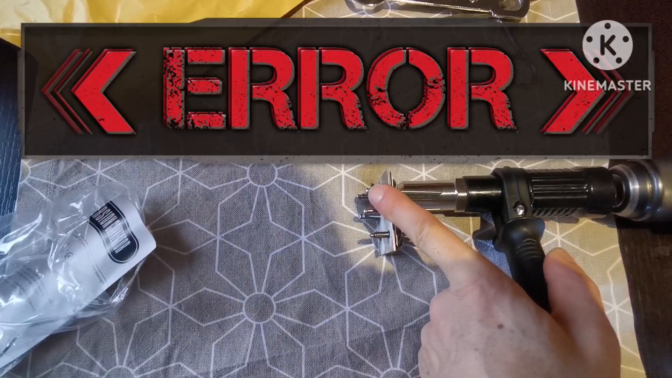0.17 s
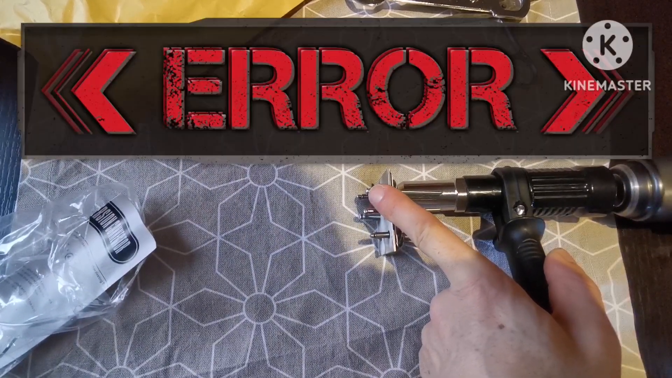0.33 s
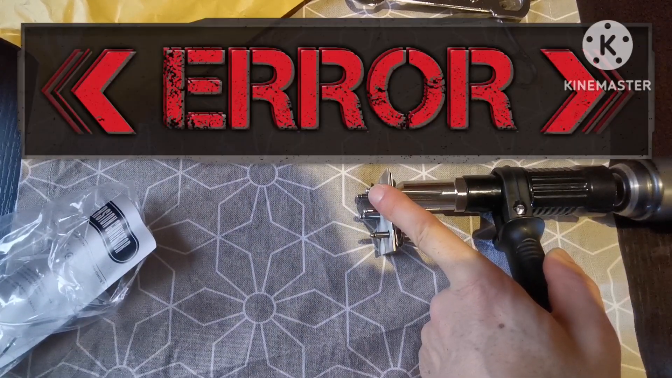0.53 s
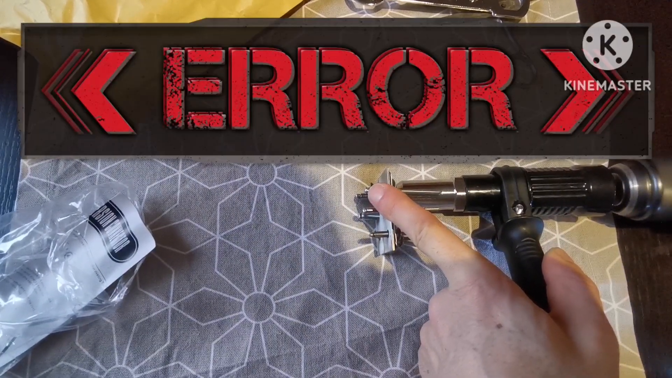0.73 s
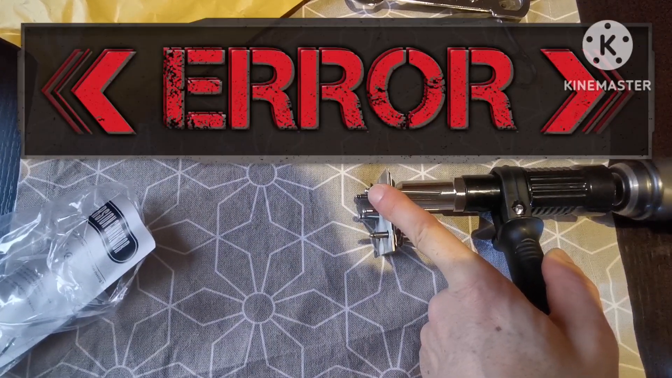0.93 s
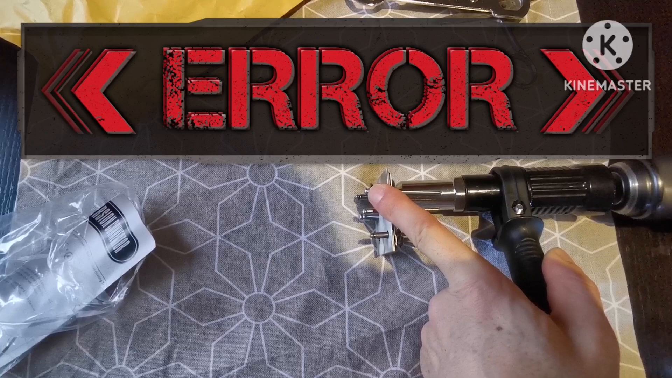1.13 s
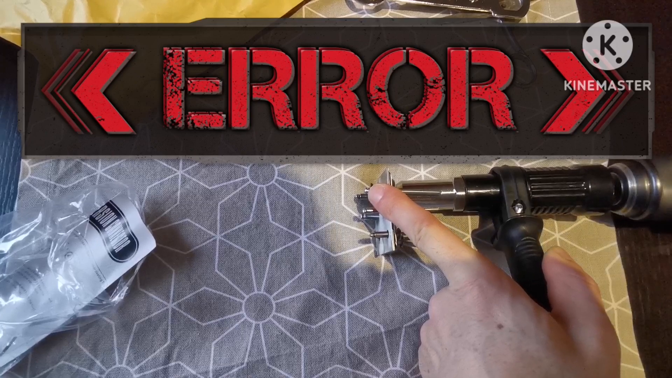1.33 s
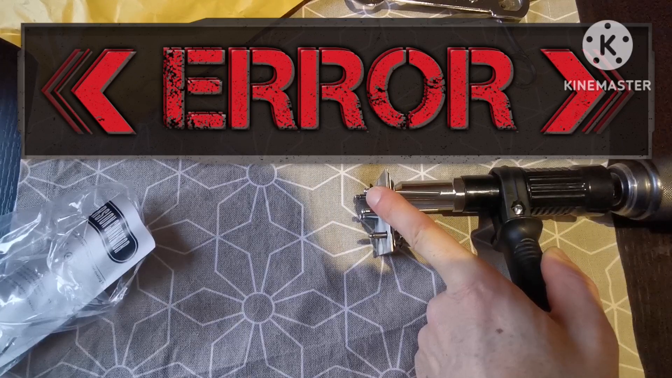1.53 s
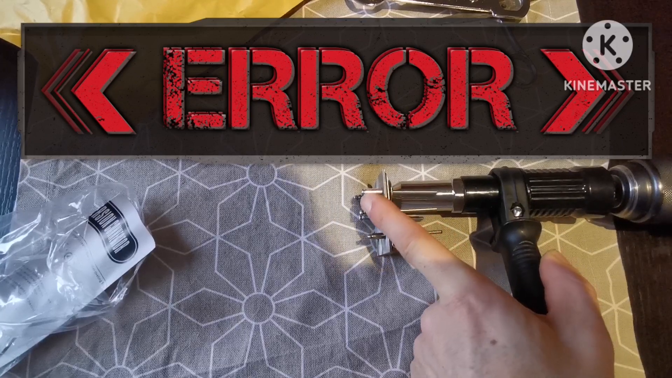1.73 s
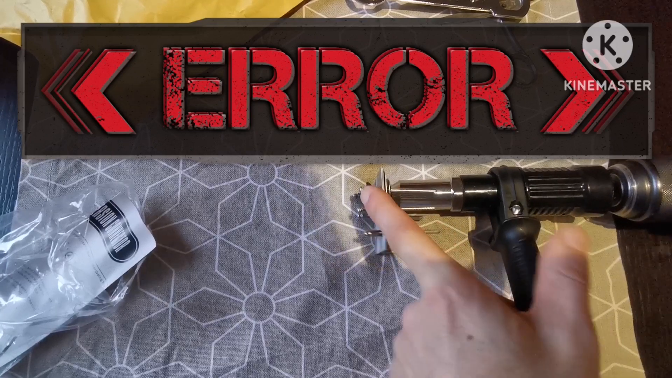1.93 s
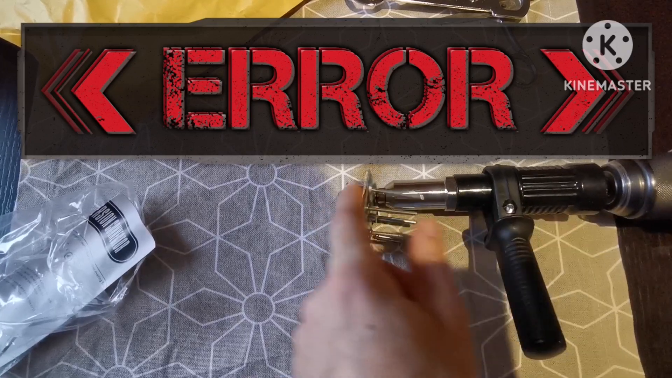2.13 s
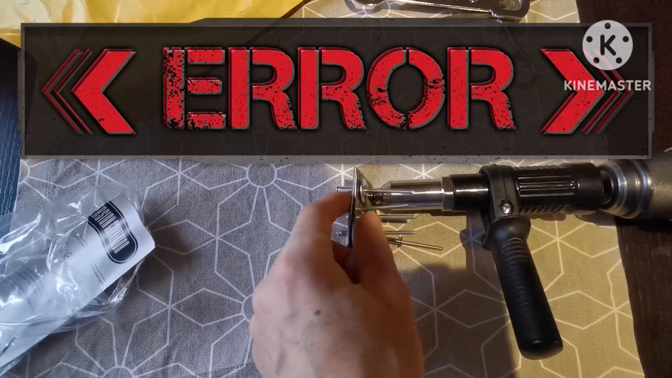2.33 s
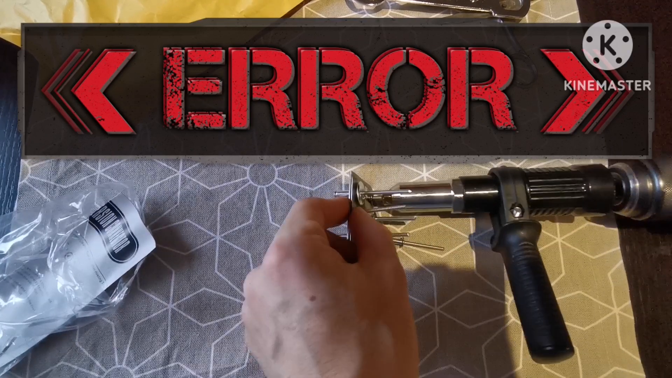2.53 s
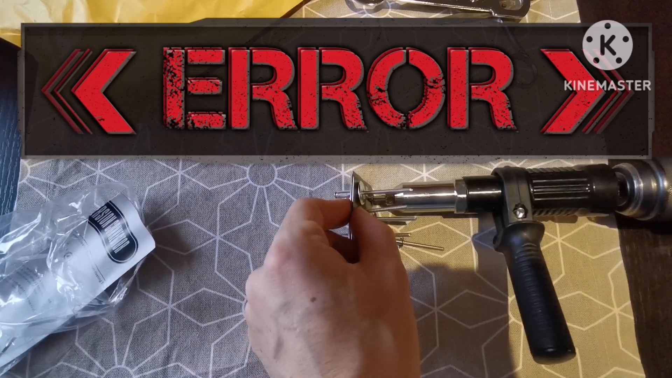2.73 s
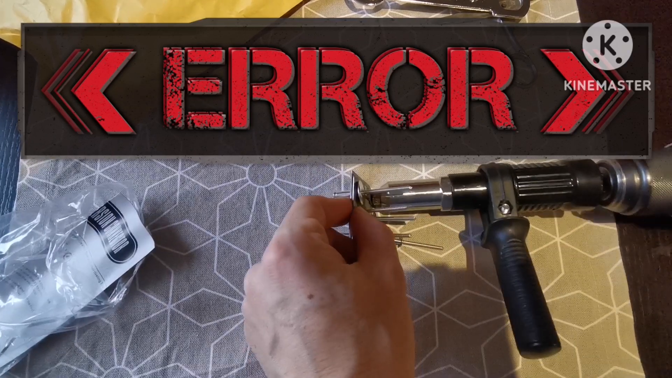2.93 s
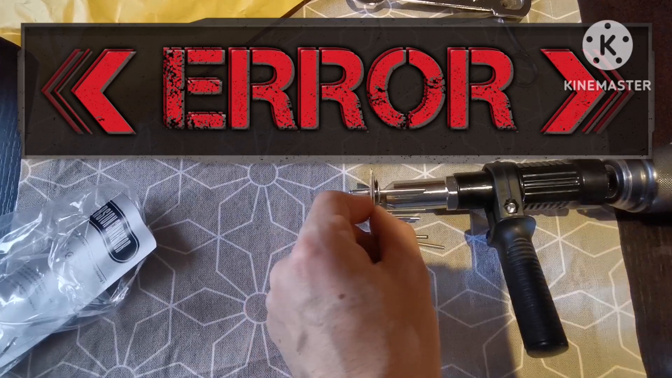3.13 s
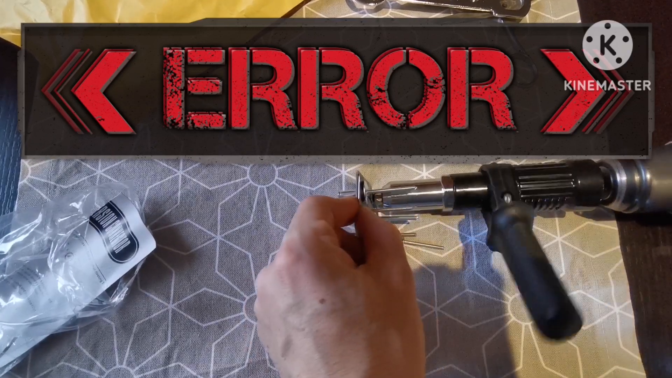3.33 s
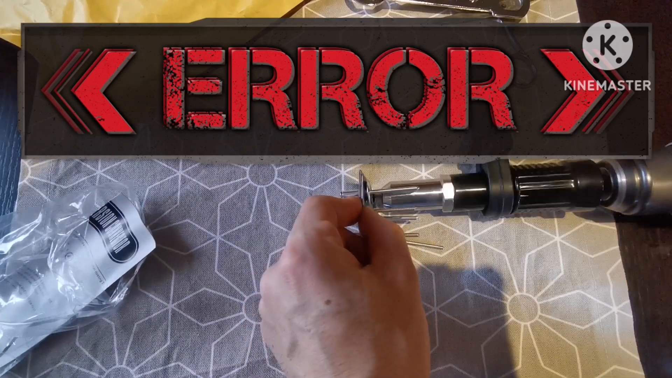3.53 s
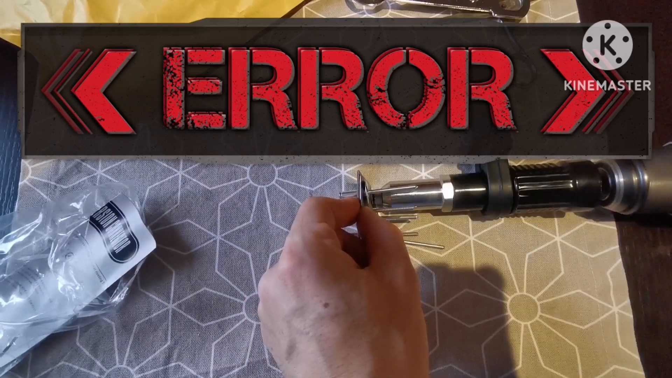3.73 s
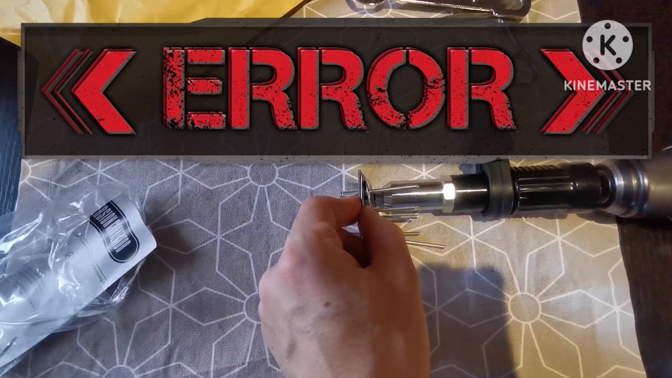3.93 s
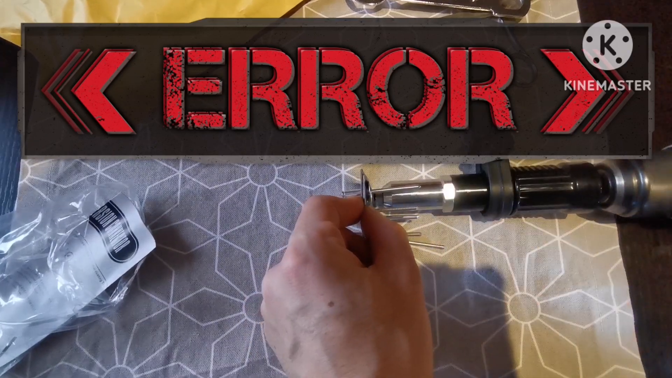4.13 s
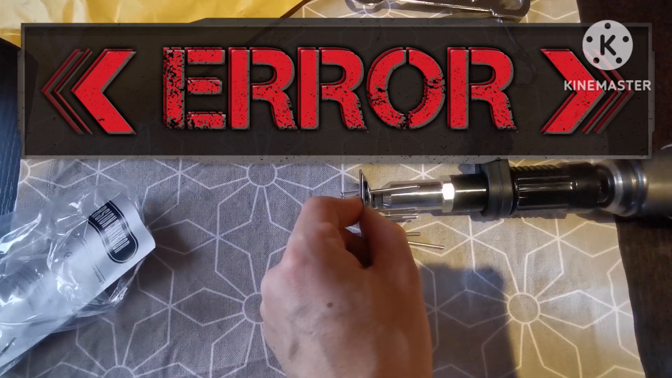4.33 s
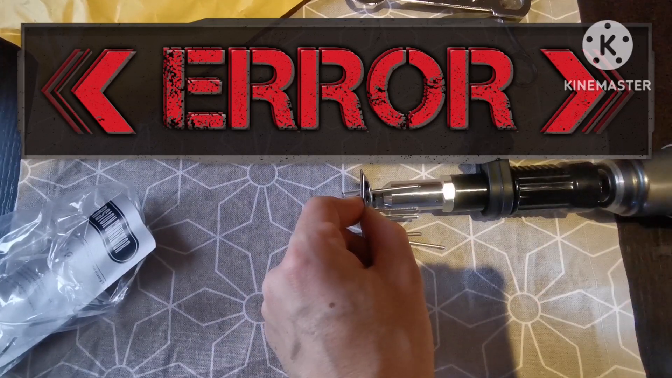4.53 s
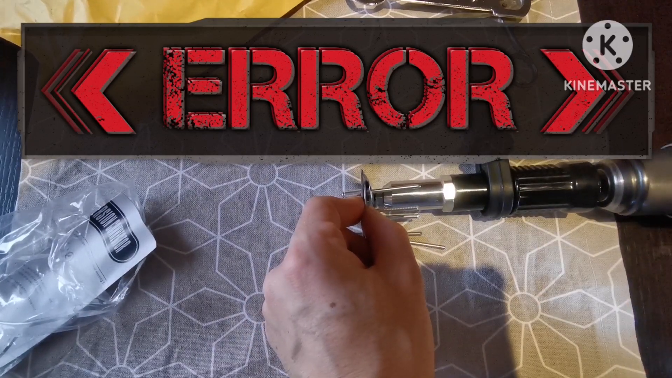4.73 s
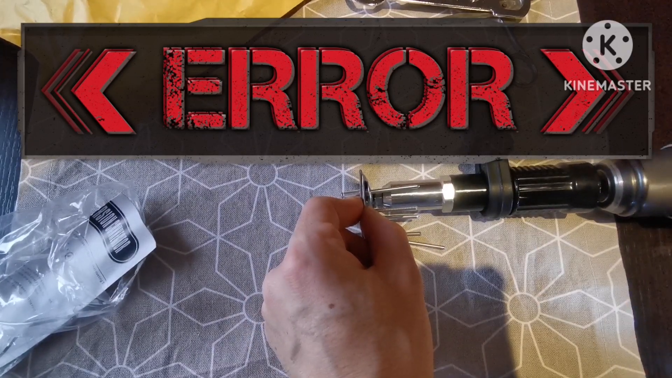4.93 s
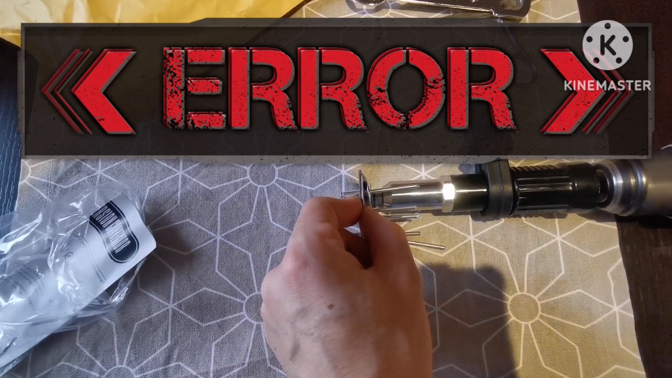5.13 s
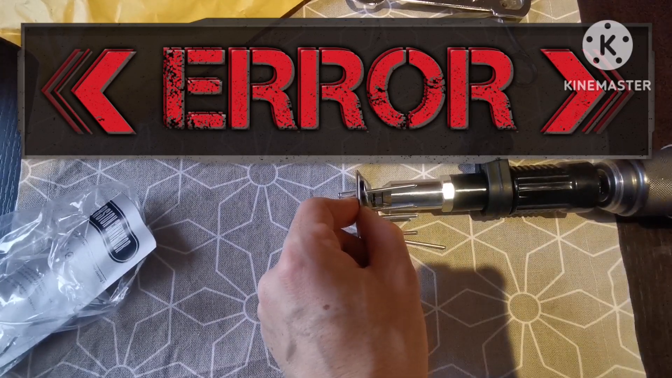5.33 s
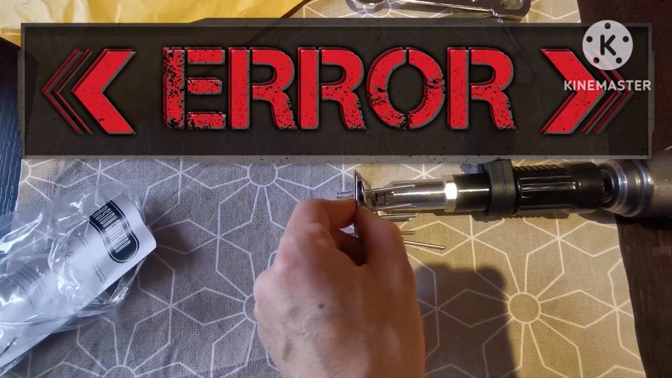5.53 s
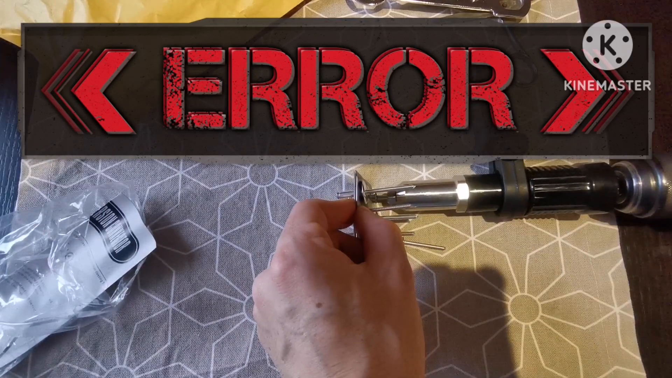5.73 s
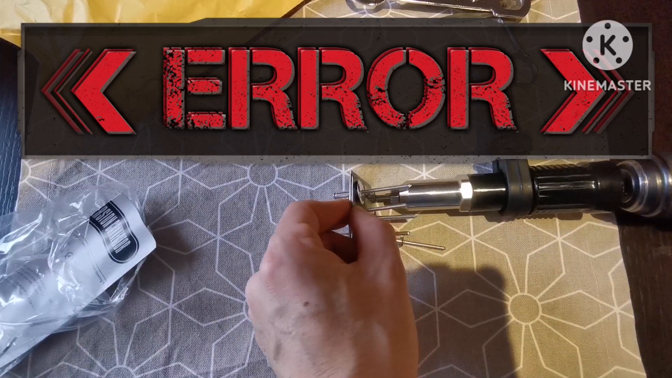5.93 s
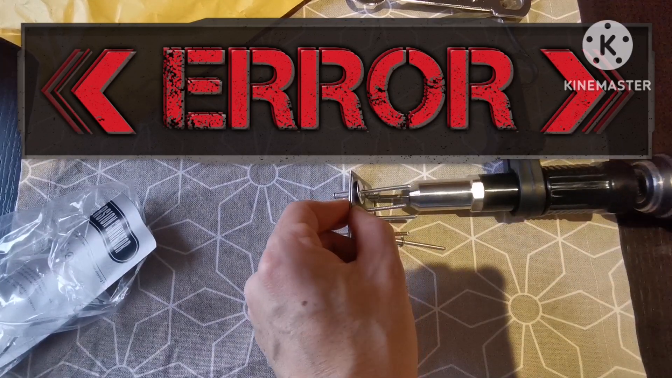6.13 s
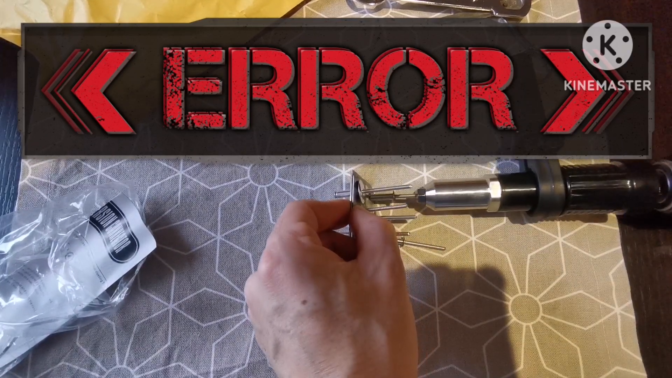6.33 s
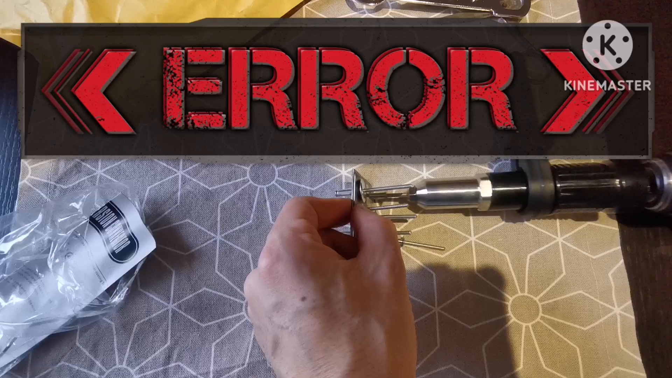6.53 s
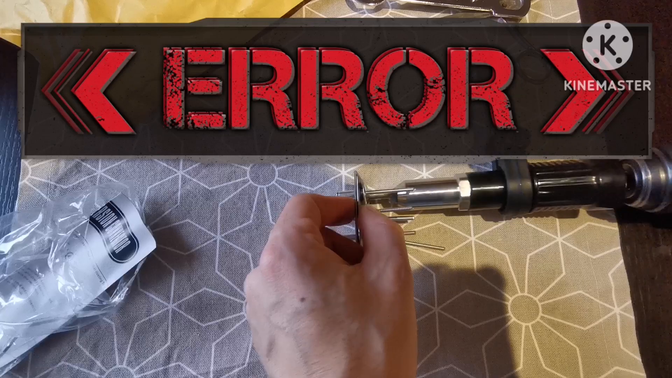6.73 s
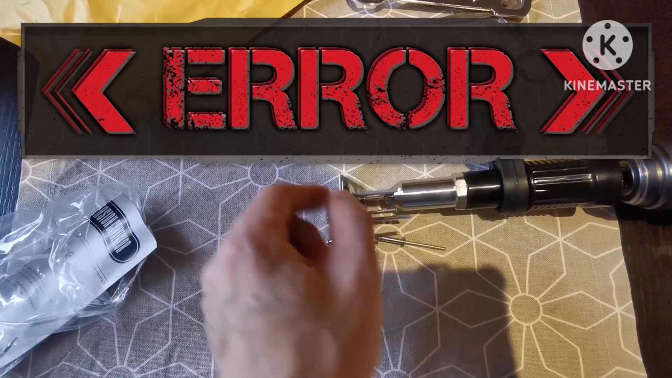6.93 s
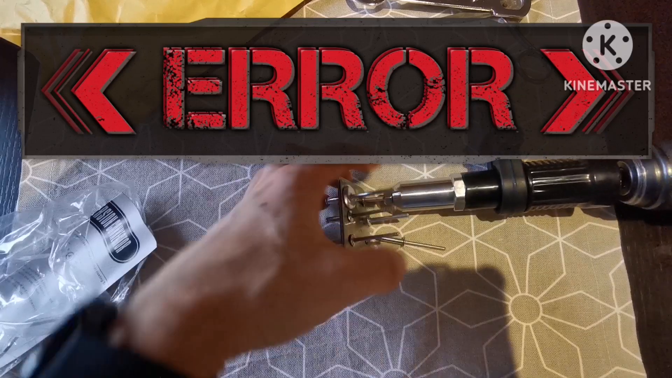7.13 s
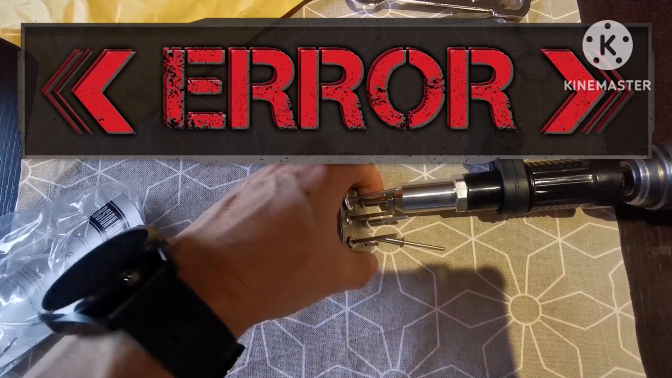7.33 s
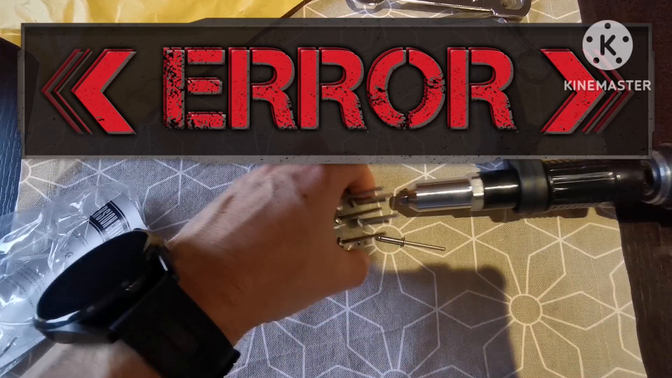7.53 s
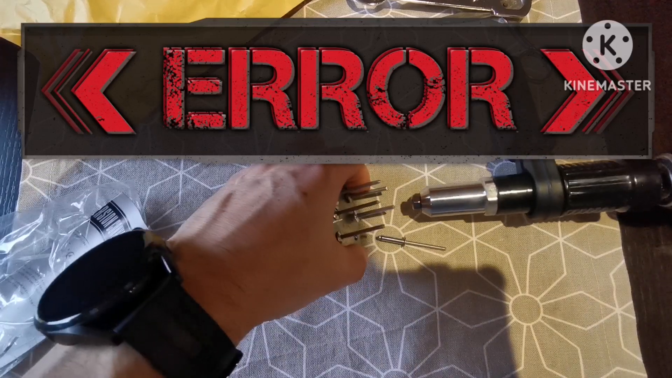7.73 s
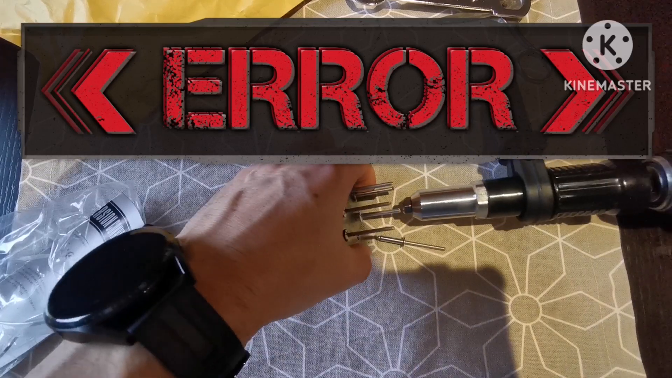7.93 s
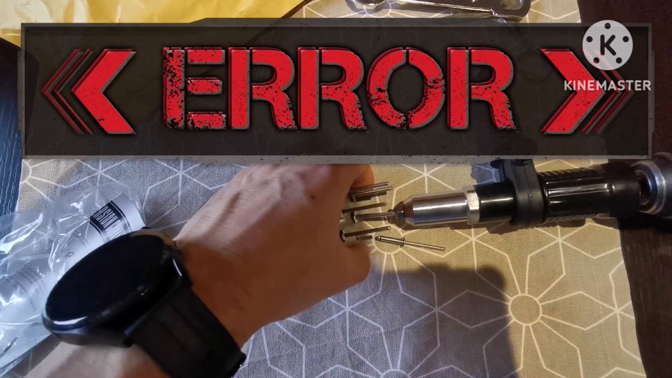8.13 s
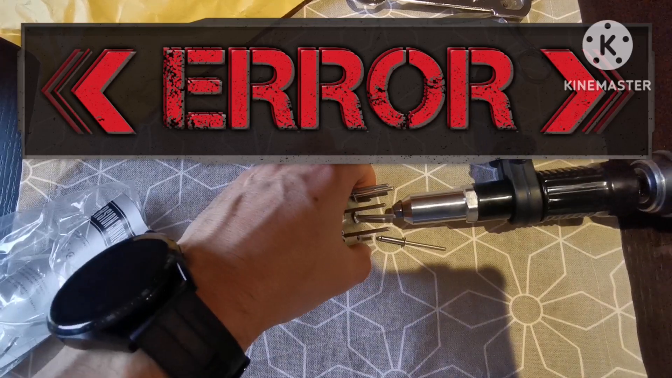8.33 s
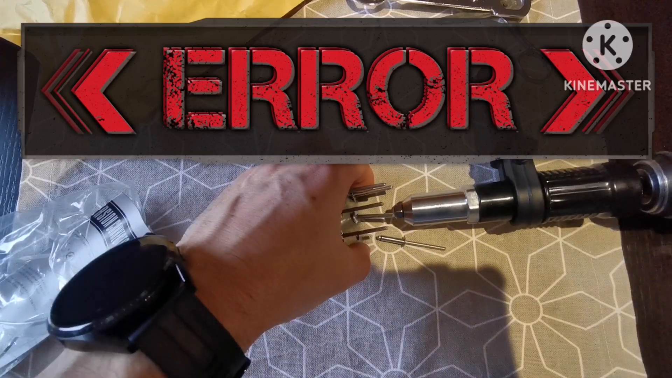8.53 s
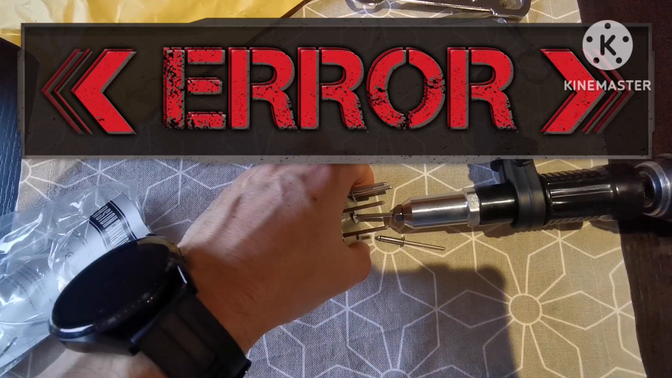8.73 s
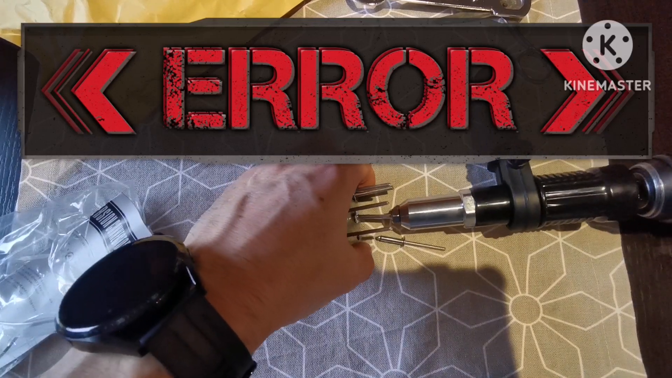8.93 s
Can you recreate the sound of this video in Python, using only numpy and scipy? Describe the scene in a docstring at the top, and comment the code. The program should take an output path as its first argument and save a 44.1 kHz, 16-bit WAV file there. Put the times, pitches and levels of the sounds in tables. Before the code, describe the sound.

A cordless drill whines and rattles through three runs with a riveting attachment, snapping a rivet stem, with small metal ticks between and after.

```python
"""A cordless drill turns a riveting adapter on a cloth-covered table, close by, in three runs.
Switched motor current makes the windings whistle, the gears whine and rattle, the shaft shakes the
table, and the adapter hisses and clicks once a turn. In the second run the rivet stem snaps; the
spindle lock clacks after the last two. Between and after runs a hand rubs the cloth, bumps the table
and shifts the metal workpiece. Under it all: still room air and, briefly, a faint hum."""
import sys
import numpy as np
from scipy import signal
from scipy.fft import rfft, irfft, next_fast_len
from scipy.io import wavfile
from scipy.ndimage import uniform_filter1d

SR = 44100
rng = np.random.default_rng(int(sys.argv[2]) if len(sys.argv) > 2 else 0)


def wav_out(sig):
    """Save sig, one row per channel (or a flat mono array), as 16-bit PCM at SR to the path in sys.argv[1]."""
    wavfile.write(sys.argv[1], SR, np.round(np.clip(np.atleast_2d(sig).T, -1, 1) * 32767).astype(np.int16))


N = 400428
T = np.arange(N) / SR
SNAP_S = 3.6503

# Trigger pulls. Each row: start in s, top speed in turns/s, spin-up time constant in s; rattle onset,
# ease-off and brake in s; adapter turns to the first click; whistle onset and trigger home in s;
# relative levels in dB of whistle, rattle, shudder, hiss, sleeve ring and click thump.
RUNS = [(.042, 247.45, .1163, 0, 1.2525, 1.413, .964, -.045, .15, -37, -36.5, -39.5, -42, -40, -50),
        (3.3, 190, .3, 3.312, 3.82, 3.87, .892, 3.245, 3.53, -41.5, -37, -45, -42.5, -39, -40),
        (4.029, 218.25, .3249, 4.076, 5.272, 5.272, .3715, 4.03, 5.15, -45.5, -35.5, -45.5, -39, -31, -41)]
# Response of the shaken table. Each row: frequency in Hz, relative level in dB.
SHUDDER = [(20, -30.5), (55, -6), (130, -9), (165, -6), (202, 2), (228, -6.5), (262, 4), (340, -3),
           (450, -2.5), (700, -8), (1500, -30.5), (4000, -63.5)]


def amp(db):
    return 10 ** (np.asarray(db) / 20)


def unit_rms(x):
    return x / np.sqrt(np.mean(x ** 2) + 1e-20)


def curve_at(points, hz):
    """Interpolate over log frequency."""
    f, value = np.transpose(points)
    return np.interp(np.log(hz + 1), np.log(f + 1), value)


def add(mix, start_s, sound):
    part = mix[..., max(round(start_s * SR), 0):][..., :sound.shape[-1]]
    part += sound[..., :part.shape[-1]]


def wander(hz):
    """Random drift below hz, unit RMS."""
    size = next_fast_len(N // 16)
    freqs = np.fft.rfftfreq(size, N / SR / size)
    slow = irfft(rfft(rng.standard_normal(size)) / (1 + (freqs / hz) ** 4), size)
    return unit_rms(np.interp(T, np.linspace(0, N / SR, size), slow))


def colour(x, spectrum, size=4096):
    """Minimum-phase filter of unit energy."""
    log_gain = np.log(amp(curve_at(spectrum, abs(np.fft.fftfreq(size, 1 / SR)))))
    taps = np.fft.ifft(np.exp(np.conj(signal.hilbert(log_gain)))).real[:size // 2]
    return signal.oaconvolve(np.atleast_2d(x), taps[None] / np.linalg.norm(taps), axes=1)[:, :N]


def burst(decay_s, channels=1, size=6000, rise_s=.001):
    """Contact chatter: noise that rises fast and dies away."""
    t = np.arange(size) / SR
    fade = np.exp(-t / decay_s) * (1 - np.exp(-t / rise_s))
    x = rng.standard_normal((channels, size)) * fade
    return x * np.linalg.norm(fade) / np.linalg.norm(x, axis=1, keepdims=True)


def band(x, hz, octaves):
    """Broad resonance, octaves to each side of hz."""
    edges = np.clip([hz / 2 ** octaves, hz * 2 ** octaves], 20, SR / 2 - 1500)
    sos = signal.butter(3, edges, "band", fs=SR, output="sos")
    return signal.sosfilt(sos, x) * np.sqrt(SR / 2 / np.diff(edges))


def ring(modes, size=6000):
    """Struck modes whose shares vary from blow to blow."""
    t = np.arange(size) / SR
    return sum(amp(db - 60 * t / t60) * np.sin(2 * np.pi * hz * t) * rng.uniform(.7, 1.3)
               for hz, db, t60 in modes)


def room(x, wet_db):
    """Direct sound plus a stereo tail, thin in the bass."""
    # Each row: frequency in Hz, T60 in s.
    decay = [(150, 0.28), (400, 0.037), (1000, 0.41), (2800, .4), (7000, 0.3), (15000, 0.18)]
    size = SR // 2
    echoes = rng.choice([-1., 1.], (2, size)) * (rng.random((2, size)) < .1) * (np.arange(size) > 150)
    hz, t, z = signal.stft(echoes, SR, nperseg=256)
    fade = amp(-60 * t / curve_at(decay, hz)[:, None])
    tail = signal.istft(z * fade * (hz / (hz + 250))[:, None], SR)[1]
    tail /= np.linalg.norm(tail[0])
    return x + amp(wet_db) * signal.oaconvolve(x * np.ones((2, 1)), tail, axes=1)[:, :N]


def ears(x, left_delay_s=.00034):
    """Mix rows (direct, scattered left, scattered right) to stereo; the drill lies to the right."""
    # Each row: frequency in Hz, share of power common to both ears.
    coherence = [(300, 0.93), (600, 0.48), (2000, 0.49), (8000, 0.15)]
    # Each row: frequency in Hz, left minus right in dB.
    balance = [(60, 6), (250, 4.5), (500, -.5), (2000, -1), (4000, -.5), (7500, -2), (10500, -8),
               (13000, -10), (16000, -10)]
    hz, z = np.fft.rfftfreq(N, 1 / SR), rfft(x)
    common, side_db = np.clip(curve_at(coherence, hz), 0, 1), curve_at(balance, hz) / 2
    delay = np.exp(-2j * np.pi * hz * np.array([[left_delay_s], [0]]))
    stereo = np.sqrt(common) * delay * z[0] + np.sqrt(1 - common) * z[1:]
    return irfft(stereo * amp([side_db, -side_db]), N)


def running(start_s, brake_s, attack_s, run_out_s=.084):
    """Envelope: attack, hold, run out under the brake."""
    run_out = np.exp(-np.clip((T - brake_s) / run_out_s, 0, 10) ** 2)
    return np.clip((T - start_s) / attack_s, 0, 1) * run_out


def air(level_db=-66.5):
    """Still room air, alike in both ears in the bass."""
    # Each row: frequency in Hz, relative density in dB.
    spectrum = [(20, -4), (50, -1), (110, -5), (220, -3.5), (500, -16), (1000, -21.5), (3000, -26),
                (8000, -34), (16000, -30)]
    noise = colour(rng.standard_normal((3, N)), spectrum)
    common, apart = noise[0], noise[1:]
    low = signal.butter(1, 500, fs=SR)
    return amp(level_db) * (signal.lfilter(*low, common) + apart - signal.lfilter(*low, apart))


def controller(switch_hz=3896, drop_db=11, drop_s=.08, fade_db_per_s=7, overtone_db_per_s=40):
    """Switched current makes the windings whistle, less once the trigger is home; overtones go first."""
    # Each row: multiple of the switching rate, relative level in dB.
    harmonics = [(1, 4), (2, -15.5), (3, -23.5), (4, -23)]
    out = np.zeros(N)
    for run in RUNS:
        brake_s, _, start_s, home_s, whistle_db = run[5:10]
        held_s = np.maximum(T - home_s, 0)
        loss_db = drop_db * np.minimum(held_s / drop_s, 1) + fade_db_per_s * held_s
        gain = running(start_s, brake_s, attack_s=.085) * amp(whistle_db - loss_db)
        on = gain > 1e-6
        for k, db in harmonics:
            dulling_db = (k > 1) * overtone_db_per_s * (T[on] - start_s)
            out[on] += gain[on] * amp(db - dulling_db) * np.sin(2 * np.pi * k * switch_hz * T[on])
    flutter = amp(1.8 * wander(54))
    return np.sqrt(2) * out * flutter * amp([[-2], [-5.5]])


def shaft(run, ease_tau_s=.524, brake_tau_s=.09):
    """Speed in turns/s: nears its top, sags as the trigger eases, falls under the brake."""
    start_s, top_rps, spin_up_s, _, ease_s, brake_s = run[:6]
    rise = 1 - np.exp(-np.clip(T - start_s, 0, ease_s - start_s) / spin_up_s)
    sag = np.clip(T - ease_s, 0, brake_s - ease_s) / ease_tau_s
    braking = np.clip(T - brake_s, 0, 2) / brake_tau_s
    return top_rps * rise * np.exp(-sag - braking)


def drive(crawl_rps=66, full_rps=240, take_up_s=.056):
    """Shaft speed and the gains of rattle, shudder and hiss, which grow with speed and pressure."""
    # Push on the work. Each row: time in s, relative level in dB.
    pressure = [(.3, -0.5), (.6, -2), (1, 1), (1.3, -0.5), (3.5, -2), (4.3, -3), (4.8, 2.5), (5.25, -3)]
    speed_rps, rattle, shudder, hiss = np.zeros((4, N))
    for run in RUNS:
        bite_s, _, brake_s = run[3:6]
        rattle_db, shudder_db, hiss_db = run[10:13]
        run_rps, on = shaft(run), running(bite_s, brake_s, take_up_s)
        pace = np.hypot(run_rps, crawl_rps) / full_rps
        speed_rps += run_rps
        rattle += on * amp(rattle_db) * pace ** .7
        shudder += on * amp(shudder_db) * pace ** .68
        hiss += on ** 3 * amp(hiss_db) * pace ** .86  # starts last, dies first
    press_db = np.interp(T, *np.transpose(pressure))
    return speed_rps, rattle * amp(.38 * press_db), shudder * amp(press_db), hiss * amp(.7 * press_db)


def motor(speed_rps, rattling, shaking, hissing, growl_db=-7, sing_rps=100):
    """Teeth rattle and mesh in gliding lines, the adapter hisses, shaft unbalance shakes the table."""
    # Each row of both: frequency in Hz, relative density in dB.
    gear_spectrum = [(100, -24), (450, -13.5), (900, 1), (1600, -3), (2300, 1), (3300, -3), (5000, -1),
                     (6800, -3.5), (8200, -12.5), (12000, -27), (16000, -36)]
    hiss_spectrum = [(4000, -25.5), (8200, -6), (9150, -1.5), (9700, -5), (10500, -1), (11700, -3.5),
                     (12800, 1.5), (14200, -5), (15400, -3.5), (16500, -3.5)]
    # Gear and motor lines. Each row: shaft multiple, relative dB in the first run, in later runs.
    orders = [(4, -20, -22), (5, -14, -6), (6, -26, -20), (8.32, -13, -17), (9.31, -13.5, -11),
              (10.32, -17, -21), (15.92, -13, -22), (18.3, -14, -23), (18.65, -13, -11.5), (19.6, -15, -23),
              (27, -17, -22), (28, -14, -12), (30, -19, -17), (36, -17, -14), (37.3, -19, -16),
              (51, -14, -19), (52, -22, -16)]
    # Radiation of the housing. Each row: frequency in Hz, gain in dB.
    housing = [(350, -28), (600, -14), (760, 0), (1070, 1), (1250, -6), (1400, -3), (1800, -6), (2300, 2),
               (2900, -5), (3800, -8), (4600, 4), (5400, -1), (7500, -6), (9000, -18)]
    phase = 2 * np.pi * np.cumsum(speed_rps * (1 + .002 * wander(17))) / SR
    bite = (1 + .15 * np.cos(phase)) * amp(2 * wander(320))  # teeth bite harder once a turn
    rattle, shudder, hiss = rng.standard_normal((3, 3, N)) * unit_rms(bite)
    out = rattling * colour(rattle, gear_spectrum) + hissing * colour(hiss, hiss_spectrum)
    growl = amp(growl_db + curve_at(SHUDDER, speed_rps) + .87 * wander(8.1)) * np.sin(phase)
    out += shaking * (colour(shudder, SHUDDER) + growl)
    # Gears sing louder under the torque of spin-up or braking, hardly at a crawl.
    torque_db = np.clip(uniform_filter1d(abs(np.gradient(speed_rps)) * SR, size=3000) / 50, 0, 6)
    crawl_db = -16 * np.maximum(1 - speed_rps / sing_rps, 0)
    for multiple, first_db, later_db in orders:
        db = np.where(T < 2, first_db, later_db) + crawl_db + torque_db
        db += curve_at(housing, multiple * speed_rps) + 2 * wander(15)
        out[0] += 2 * rattling * amp(db) * np.sin(multiple * phase)
    return out


def click_times(run, gear_ratio=16.07, slip_turns=.387):
    """Times in s of whole adapter turns before the brake; the snap slips the adapter back."""
    start_s, brake_s, first_turns = run[0], run[5], run[6]
    slip = slip_turns * (T > SNAP_S) * (start_s < SNAP_S)
    turns = np.cumsum(shaft(run)) / SR / gear_ratio - first_turns - slip
    times = T[1:][np.diff(np.floor(turns)) > 0]
    return times[times < brake_s]


def adapter(shaking, thump_hz=70, click_decay_s=.0018, knock_decay_s=.013):
    """Once a turn a click rings the steel sleeve and knocks the tool into the table."""
    # Each row: frequency in Hz, relative density in dB.
    click_spectrum = [(100, -6.5), (600, 2.5), (2300, 6), (3500, -0.5), (6000, 0), (8300, -3), (10500, -6),
                      (16000, -8)]
    # Each row: frequency in Hz, relative level in dB, T60 in s.
    sleeve_modes = [(7505, 0, .045), (7400, -9, .03), (9180, -6, .03), (6800, -10, .02)]
    clicks, knocks, rings = np.zeros((3, 3, N))
    for run in RUNS:
        sleeve_db, thump_db = run[-2:]
        for s in click_times(run):
            click_spread_db, ring_spread_db = rng.uniform(-1, 1, 2) * np.sqrt(3) * [1, 3]
            add(clicks, s, amp(-14 + click_spread_db) * burst(click_decay_s, channels=3))
            add(knocks, s, amp(8) * burst(knock_decay_s, channels=3))
            add(rings[0], s, amp(thump_db) * band(burst(knock_decay_s)[0], thump_hz, octaves=.74))
            add(rings[1:], s, amp(sleeve_db + ring_spread_db) * ring(sleeve_modes))
    return colour(clicks, click_spectrum) + colour(knocks * shaking, SHUDDER) + rings


def hand(patchy_db=6.5):
    """Hand and tool rub on the cloth and bump the table dully."""
    # Each row: start in s, length in s, level in dB.
    rubs = [(1.437, 0.25, -71), (1.95, 0.39, -68.5), (2.46, 0.38, -64), (2.945, 0.51, -65),
            (5.595, .8, -68), (6.492, .3, -66), (7.194, 0.64, -68.5), (8.75, 0.62, -69.5)]
    # Each row: frequency in Hz, relative density in dB.
    cloth_spectrum = [(25, -5.5), (50, 6.5), (110, -5.5), (230, 4.5), (350, -1), (600, -15), (1500, -29.5),
                      (5000, -45)]
    # Each row: start in s, relative level in dB, centre in Hz.
    bumps = [(2.058, -58, 209), (2.16, -44, 250), (2.512, -73, 1830), (2.626, -41.5, 262),
             (2.692, -45, 300), (2.944, -53, 520), (3.001, -40, 227), (3.013, -41.5, 535),
             (3.189, -50, 272), (6.665, -52.5, 246.7), (6.667, -66, 1207), (8.199, -58, 1630),
             (9.034, -48, 214)]
    thuds = np.zeros((1, N))
    for s, db, hz in bumps:
        add(thuds, s, amp(db - 1) * band(burst(decay_s=.02), hz, octaves=.78))
    rubbing = sum(amp(db) * np.sin(np.pi * np.clip((T - s) / length_s, 0, 1))
                  for s, length_s, db in rubs)
    cloth = amp(patchy_db * wander(25)) * rubbing * colour(rng.standard_normal(N), cloth_spectrum)
    return thuds + cloth


def hum(hz=150.4):
    """A faint, wavering hum in the room."""
    # Each row: time in s, relative level in dB.
    levels = [(1.5, -68), (2.3, -72.5), (2.42, -58.5), (2.56, -57), (2.65, -64), (3.1, -68)]
    db = np.interp(T, *np.transpose(levels), left=-200, right=-200)
    gain = uniform_filter1d(amp(db - 2), size=200)
    return np.sqrt(2) * gain * np.sin(2 * np.pi * hz * T + .25 * wander(1.7))


def hard_ticks(tick_decay_s=.00088, chatter_decay_s=.0077, body_hz=4200):
    """Small hard ticks: rivets and plate touch, and the trigger switch ticks before the second run."""
    # Each row: start in s, relative level in dB, centre in Hz, left minus right in dB.
    ticks = [(2.0795, -44.5, 7130, 3), (2.102, -42, 12400, -3), (2.3, -32, 8200, 1),
             (2.513, -36.5, 3900, -0.5), (2.6984, -30, 13100, -6), (2.9998, -20, 8330, -3),
             (3.238, -40.5, 7180, -13), (6.4434, -45.5, 6500, -4.0), (6.7802, -23, 7400, -5),
             (7.045, -26.5, 10440, -10), (7.056, -14, 15500, -11), (7.2828, -50, 14150, -17),
             (7.332, -46.5, 6410, -14), (7.4324, -33, 11900, -7), (7.449, -32.5, 11900, -10),
             (8.1, -45.5, 2060, -7), (8.1875, -32, 7500, -4), (8.8277, -49.5, 2730, -7),
             (8.8696, -38.5, 8500, -8), (9.0414, -43.5, 6250, -7.5)]
    # Each row: frequency in Hz, relative level in dB, T60 in s.
    metal_modes = [(3100, -17, .06), (4900, -14, .08), (7100, -8, .06), (9200, -1, .1), (10800, -2, .1),
                   (14300, 0, .09)]
    out = np.zeros((2, N))
    for s, db, hz, pan_db in ticks:
        contact = burst(tick_decay_s, channels=2) + amp(-24) * burst(chatter_decay_s, channels=2)
        body = amp(-11 - 6 * np.log2(hz / 8000)) * band(contact, body_hz, octaves=1)
        tick = band(contact, hz, octaves=.81) + body + amp(-31) * ring(metal_modes)
        add(out, s, amp(db + 4) * amp([[pan_db / 2], [-pan_db / 2]]) * tick)
    return out


def workpiece_scrapes(grain_db=4.8):
    """Metal slides on metal in grainy swells, to the right."""
    # Each row: start in s, length in s, relative level in dB, centre in Hz.
    slides = [(2.903, 0.12, -61.5, 4170), (2.986, 0.061, -43.5, 3900), (5.766, 0.041, -70, 4600),
              (6.232, 0.28, -64.5, 7750), (7.411, 0.065, -51.5, 9850), (7.562, 0.15, -53, 9500),
              (8.444, 0.13, -70, 11020), (8.699, 0.075, -74, 2770)]
    out = np.zeros((2, N))
    grains = rng.standard_normal((2, N)) * unit_rms(amp(grain_db * wander(180))) * amp([[-5], [0]])
    for s, length_s, db, hz in slides:
        part = grains[:, round(s * SR):round((s + length_s) * SR)]
        add(out, s, amp(db) * band(part, hz, octaves=1.45) * np.hanning(part.shape[1]))
    return out


def rivet_snap(shake_decay_s=.022):
    """The stem parts with one sharp crack; the tool shakes on the table."""
    # Each row: frequency in Hz, relative density in dB.
    spectrum = [(40, -13.5), (130, -2.5), (250, 8.5), (480, -7), (900, 2.5), (1400, 0.5), (2300, -2),
                (3100, -14), (6000, -24), (16000, -29.5)]
    out = np.zeros((2, N))
    add(out, SNAP_S, -amp(9) * np.ones(1))
    shake = burst(shake_decay_s) + .5 * burst(shake_decay_s, channels=2)
    add(out, SNAP_S + .0016, amp(-18) * shake)
    return colour(out, spectrum)


def spindle_lock(centre_hz=5560, decay_s=.0019):
    """The lock catches with a clack as the motor stops."""
    # Each row: start in s, level in dB.
    clacks = [(3.922, -48), (5.3232, -17.5), (5.3314, -11.5)]
    out = np.zeros((3, N))
    for s, db in clacks:
        add(out, s, amp(db) * band(burst(decay_s, channels=3), centre_hz, octaves=.72))
    return out


def scene():
    """Drill, snap and handling in the room, over air and hum."""
    speed_rps, rattling, shaking, hissing = drive()
    drill = motor(speed_rps, rattling, shaking, hissing) + adapter(shaking) + spindle_lock()
    mix = room(ears(drill), wet_db=-11) + controller()
    mix += room(rivet_snap(), wet_db=-7.5)
    mix += room(hard_ticks() + workpiece_scrapes(), wet_db=-7.5)
    mix += room(hand(), wet_db=5)
    return mix + air() + hum()


def record(dry):
    """Clip at full scale, low-pass at 15.9 kHz."""
    lowpass = signal.firwin(401, 15900, window=("kaiser", 8), fs=SR)
    return signal.oaconvolve(np.clip(dry, -1, 1), lowpass[None], "same")


dry = scene()
out = record(dry)
wav_out(out)
```